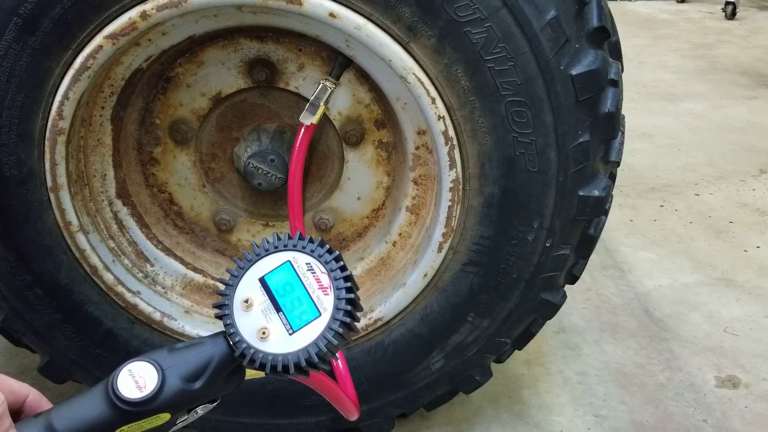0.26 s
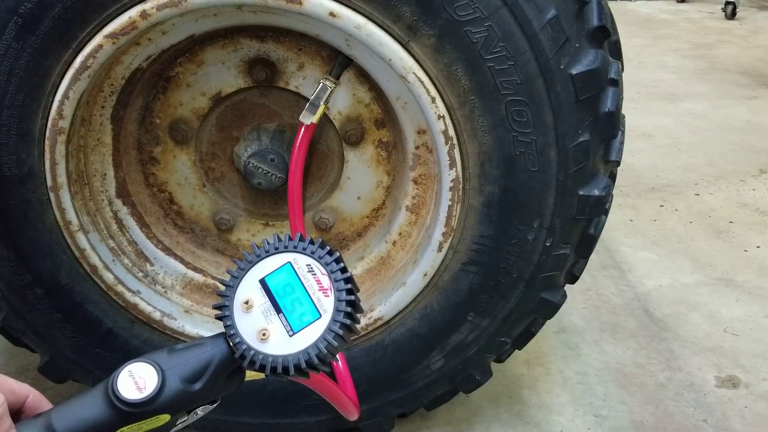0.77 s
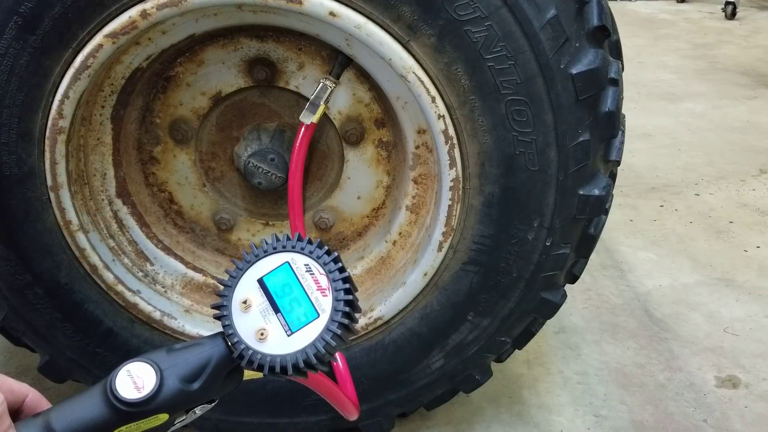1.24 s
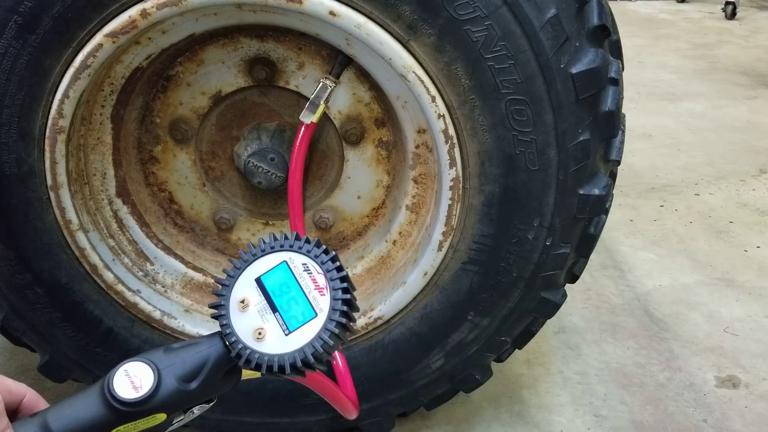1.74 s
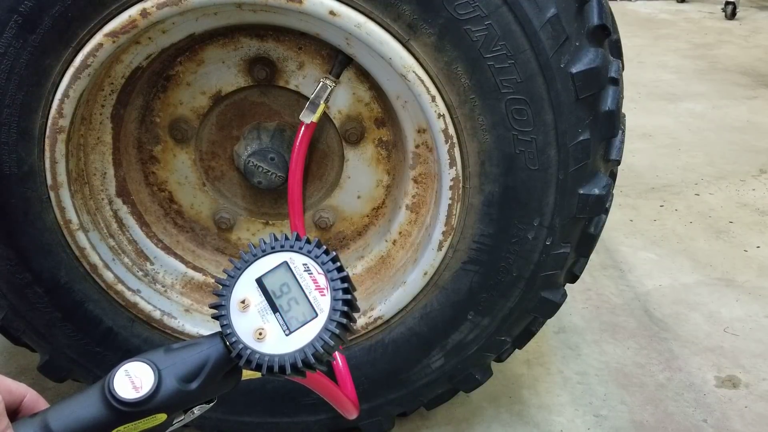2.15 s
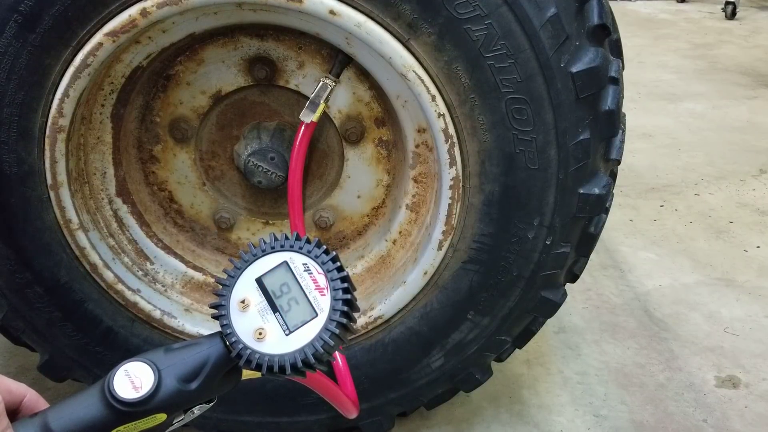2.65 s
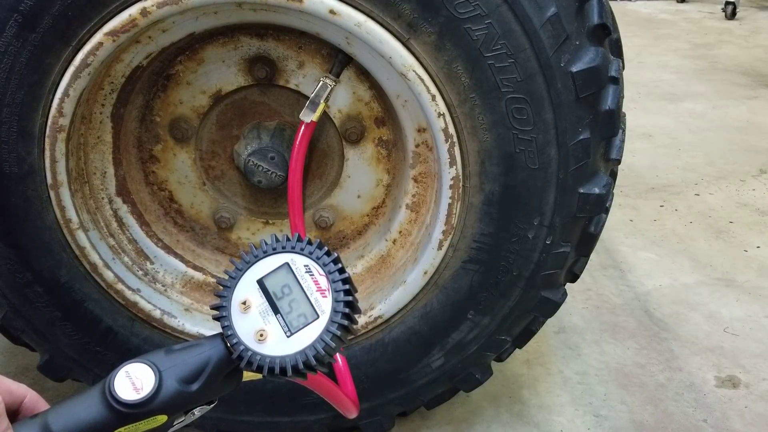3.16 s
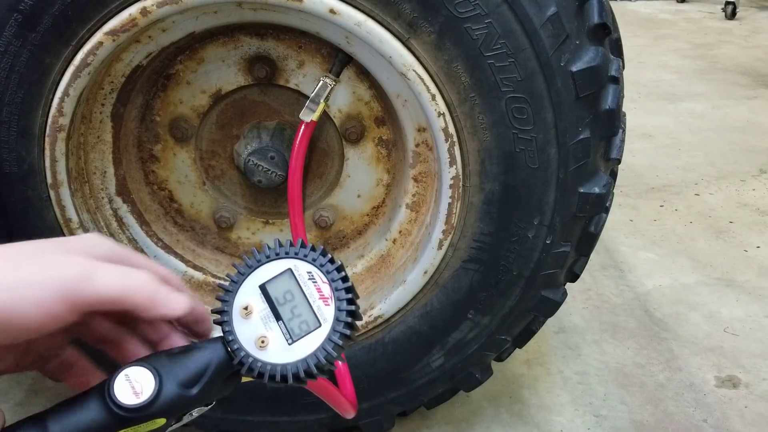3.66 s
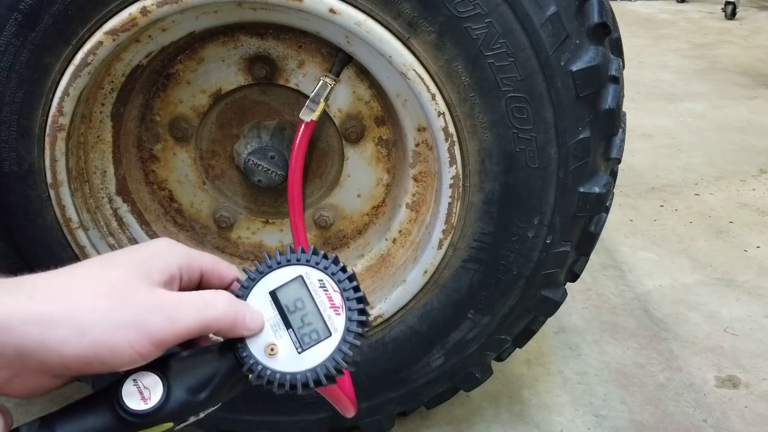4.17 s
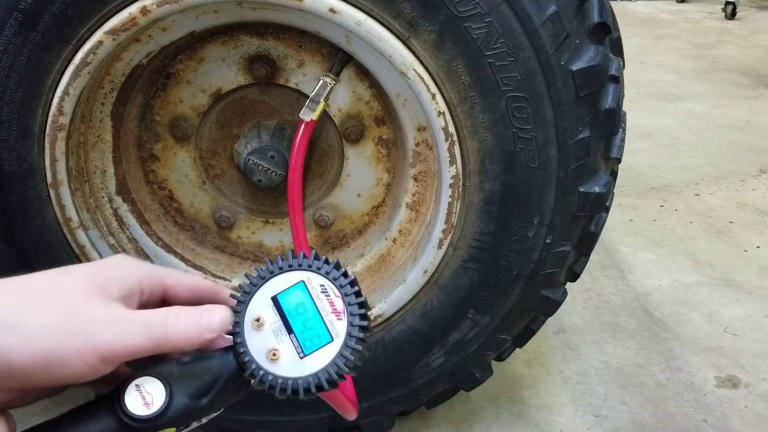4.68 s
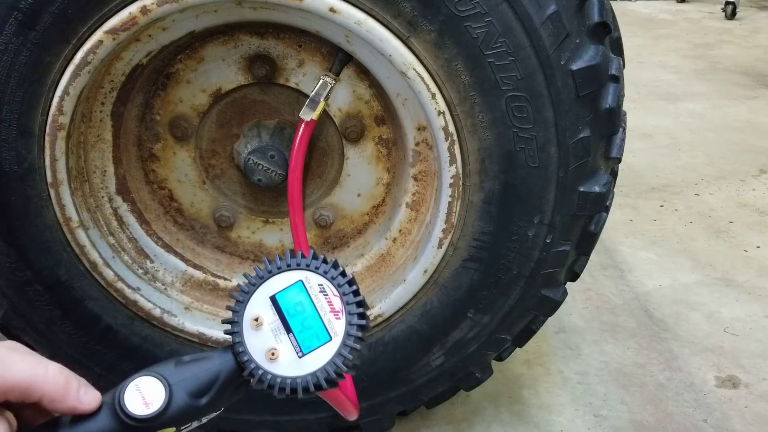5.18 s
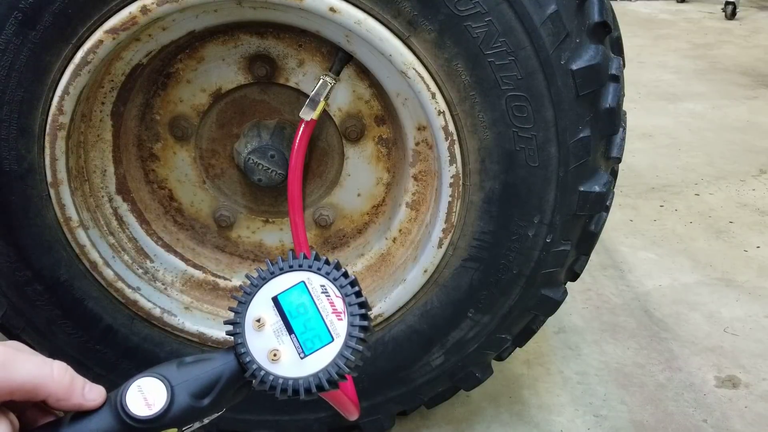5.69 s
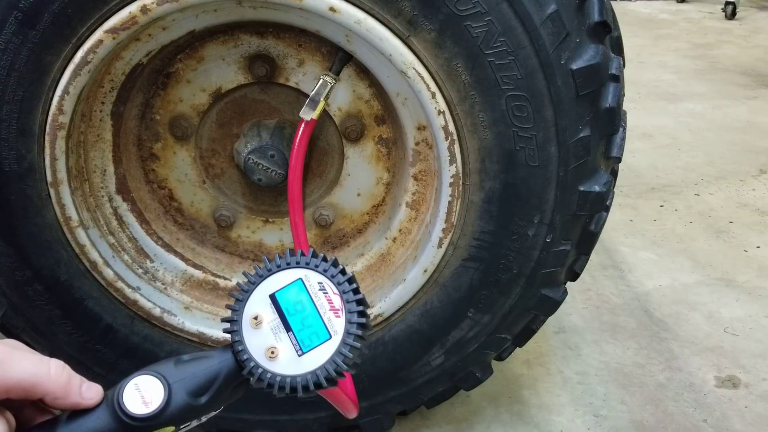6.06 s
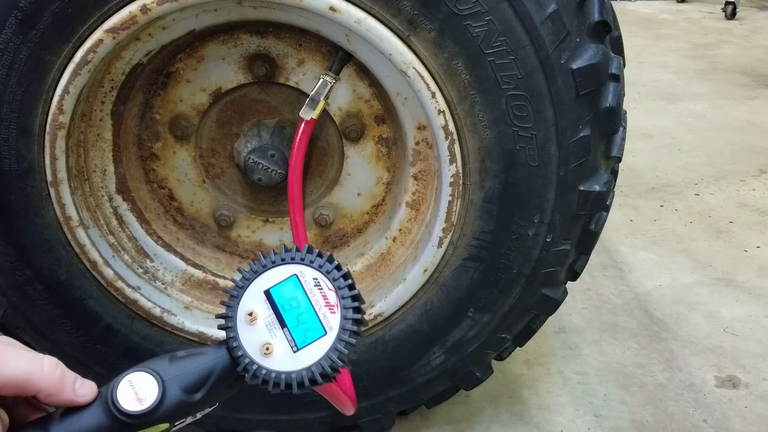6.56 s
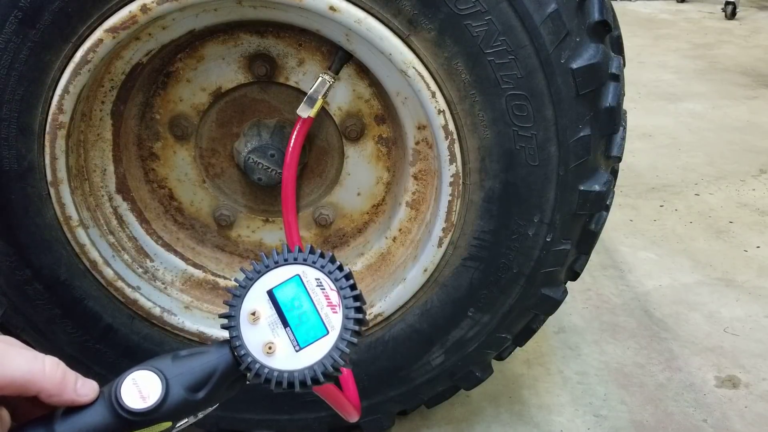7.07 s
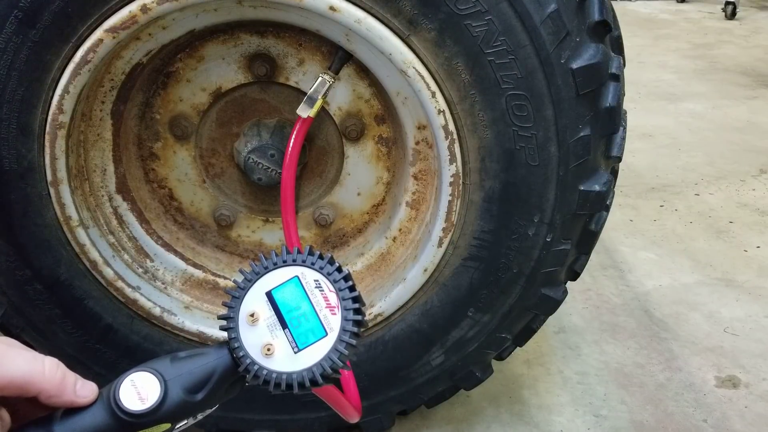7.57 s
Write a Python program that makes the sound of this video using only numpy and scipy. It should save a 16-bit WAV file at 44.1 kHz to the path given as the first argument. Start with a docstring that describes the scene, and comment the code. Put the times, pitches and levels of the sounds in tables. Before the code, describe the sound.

Compressed air rushes through an inflator hose and valve into a big tire, heard from close by in a workshop. The bright hiss swells slightly over the first half second and then holds steady, easing only a little as the tire fills. Within it the tire rings faintly and the valve gives thin, high whistles. A low, wavering electric hum and a soft rumble come up with the hiss and stay underneath. At about 6.8 seconds trapped air escapes in one short, louder, bright blast that spits slightly, with a soft thump from the valve as the flow is shut off. The hiss stops, and the hum and rumble drop away at about 6.9 seconds. The blast dies out in a short room echo, leaving near quiet from about 7.5 seconds to the end at 8. Everything sits somewhat to the left.

```python
"""First comes a hiss: compressed air rushing through an inflator hose and valve into a big tire.
The jet of air makes the inside of the tire ring and whistles faintly in the valve. A low hum
and rumble fade in at the start and drop away near the end. When the flow is shut off, trapped air
escapes in a short, bright blast with a soft thump from the valve, and dies away in the workshop."""
import sys
import numpy as np
from scipy import signal
from scipy.fft import rfft, irfft, next_fast_len
from scipy.io import wavfile

SR = 44100
rng = np.random.default_rng(int(sys.argv[2]) if len(sys.argv) > 2 else 0)


def dump(signal):
    """Clip the signal to [-1, 1] and save it as 16-bit WAV at the path in sys.argv[1]."""
    limited = np.clip(np.atleast_2d(signal).T, -1, 1)
    pcm = np.round(limited * 32767).astype(np.int16)
    wavfile.write(sys.argv[1], SR, pcm)


N = 345170
TIME, FREQS = np.arange(N) / SR, np.arange(N // 2 + 1) * SR / N

# Levels are starting points that the functions turn up or down; noise levels are per Hz.
# "Side" is how much louder the left is than the right. A "mode" is a pitch at which something rings.
# hiss of the swirling air in the valve: f/Hz, level/dB
JET_HISS = [(100, -100), (620, -99), (900, -99), (1450, -92), (2000, -84.5), (2500, -85.5), (3200, -82),
            (3700, -74), (5400, -73.5), (6400, -71), (7800, -72), (8600, -77), (10500, -74), (15500, -73)]
# where the jet is heard, and the rumble too: f/Hz, side/dB
JET_AND_RUMBLE_SIDE = [(100, 2), (300, 6.5), (600, 0), (2000, 3.5), (4500, 1), (6400, 7.5), (7500, 7),
                       (8600, 1.5), (11000, 3), (15000, 6)]
# modes of the air in the tire and of its steel rim: f/Hz, width/Hz, level/dB, side/dB
TIRE_RINGING = [(489, 17, -83, 2), (742, 15, -86, -4), (933, 66, -79, 1), (1037, 21, -78, 4),
                (1126, 7, -82, 3), (1171, 11, -78, 1), (1234, 16, -79, -2), (1387, 17, -80, 0),
                (1569, 12, -72, 5), (1639, 9, -69, 1), (1719, 7, -71, 2), (1754, 14, -72, 5),
                (1823, 10, -80, 2), (1898, 9, -75, 5), (2075, 7, -70, 3), (2111, 8, -77, 1),
                (2203, 60, -77, 4), (2265, 10, -70, 11), (2350, 17, -65, 2), (2472, 11, -69, 1),
                (2574, 8, -68, 5), (2728, 42, -73, 2), (2819, 18, -73, 6), (2924, 27, -71, 2),
                (3053, 12, -63, 2), (3107, 17, -73, 3), (3200, 11, -73, 4), (3405, 38, -67, 5),
                (3483, 10, -70, -3), (3576, 37, -70, 3)]
# modes of the valve, the hose and its nozzle: f/Hz, width/Hz, level/dB, side/dB
VALVE_WHISTLES = [(3834, 18, -69, 1), (3905, 43, -70, 4), (3995, 13, -63, 5), (4066, 22, -61, 5),
                  (4184, 10, -68, 4), (4248, 9, -72, 4), (4390, 43, -73, 5), (4505, 15, -72, 5),
                  (5054, 47, -73, 3), (5161, 11, -62, 3), (5199, 13, -63, 4), (5688, 13, -67, 7),
                  (5855, 17, -69, 5), (5995, 22, -63, 7), (6106, 30, -65, 11), (6463, 54, -64, 11),
                  (6539, 53, -62, 11), (6635, 24, -67, 12), (7111, 24, -67, 10), (7198, 14, -61, 14),
                  (7439, 25, -65, 12), (7587, 19, -68, 3), (7679, 20, -71, 7), (7901, 119, -67, 5),
                  (8888, 53, -74, -3), (9720, 56, -67, 6)]
# hiss of the blast: f/Hz, level/dB
BLAST_HISS = [(40, -88.5), (400, -79.5), (700, -81.5), (1000, -74.5), (2000, -71.5), (2900, -67),
              (3800, -58), (4600, -58.5), (6000, -60), (7100, -56), (8700, -68.5), (10500, -59),
              (12700, -58), (15000, -55)]
# brief spits within the blast: t/s, width/s, level change/dB, extra treble change/dB
BLAST_SPITS = [(6.814, .005, .5, 4), (6.869, .003, -0.5, 9), (6.898, .008, 5, -2.5)]
# tones of the electric hum: multiple of the mains frequency, level/dB, side/dB
HUM_TONES = [(2, -66.5, 3.5), (4, -68, 7.5), (6, -73, 16.5), (8, -85.5, 9)]
# low rumble: f/Hz, level/dB
LOW_RUMBLE = [(20, -96), (45, -94.5), (70, -87.5), (92, -79.5), (125, -80), (170, -87.5), (310, -85),
              (400, -92.5), (600, -98.5), (1200, -115)]
# low modes of the room, stirred by the rumble: f/Hz, width/Hz, level/dB, side/dB
ROOM_MODES = [(45, 2.8, -79, 1.5), (72.2, 2.8, -75, 3), (316.5, 10, -82.5, 7)]
# the workshop's echo: f/Hz, time to fade by 60 dB/s, level against the direct sound/dB
ROOM_ECHO = [(100, .7, -3), (500, .9, -2.5), (1300, 0.89, 7), (3700, 0.85, 4), (5000, 0.74, 1.5),
             (7000, 0.56, 4), (10120, 0.42, 1), (15000, 0.28, 3)]
# faint noise of still air: f/Hz, level/dB
STILL_AIR = [(30, -122), (170, -119), (260, -109), (350, -108), (480, -117), (700, -130), (4000, -133),
             (15000, -135)]
# how alike left and right are: f/Hz, likeness (1 = the same, 0 = unrelated)
STEREO_LIKENESS = [(60, 0.98), (150, 0.91), (400, 0.45), (800, 0.62), (1400, 0.26), (4000, 0.35), (8000, 0)]

FADE_IN_S, SHUT_S = 0.43, 6.85   # the fade-in ends; the flow is shut off
BLAST_SIDE_DB = 8


def filling(jet_db, valve_db, flutter_db, waver_db):
    """The jet of air hisses and makes the tire and valve ring; all three follow the flow."""
    full_db, opening_db = 1.23, 4.5   # the flow builds up as the valve opens
    sag_db_per_s, shut_db_per_s = 0.2736, 302   # the flow sags as the tire's pressure rises
    flow_db = full_db - opening_db * fade_in_left() - sag_db_per_s * TIME - shut_db_per_s * since(SHUT_S)
    jet = noise(from_db(at_hz(JET_HISS) + jet_db) * pan(at_hz(JET_AND_RUMBLE_SIDE)))
    tire = noise(resonances(TIRE_RINGING))
    valve = from_db(valve_db + waver_db * drift(7)) * noise(resonances(VALVE_WHISTLES))
    return (jet + tire + valve) * from_db(flow_db + flutter_db * drift(40))


def air_blast(start_s, level_db, sputter_db):
    """Trapped air bursts out, sputters and weakens as the hose empties; the treble fades first."""
    attack_s, hold_s, treble_hz = 0.00302, 0.11, 8900
    sag_db_per_s, release_db_per_s, dulling_db_per_s = 43, 331.5, 66
    age = since(start_s)
    blast_db = -sag_db_per_s * age - release_db_per_s * since(start_s + hold_s)
    treble_db = 4.5 - dulling_db_per_s * age   # brightest at full pressure
    for spit_s, width_s, change_db, extra_db in BLAST_SPITS:
        spit = np.exp(-.5 * ((TIME - spit_s) / width_s) ** 2)
        blast_db += change_db * spit
        treble_db += extra_db * spit
    air = noise(from_db(at_hz(BLAST_HISS) + level_db) * pan(BLAST_SIDE_DB))
    treble = irfft(rfft(air) * (FREQS > treble_hz), N)
    air = air - treble + treble * from_db(treble_db)
    attack = np.minimum(age / attack_s, 1)
    return air * attack * from_db(blast_db + sputter_db * drift(150))


def valve_thump(start_s, hz, fade_s, level_db, fall_s):
    """The inflator's valve gives a soft thump whose pitch falls quickly."""
    age = since(start_s)
    cycles = hz * fall_s * (1 - np.exp(-age / fall_s))
    return pan(BLAST_SIDE_DB) * from_db(level_db - 60 * age / fade_s) * np.sin(2 * np.pi * cycles)


def drone(mains_hz, hum_db, rumble_db, waver_db, drop_s):
    """A wavering electric hum and a low rumble fade in at the start and drop away near the end."""
    hum = 0
    for multiple, db, side_db in HUM_TONES:
        tone = np.sqrt(2) * np.sin(2 * np.pi * (multiple * mains_hz * TIME + rng.random()))
        hum = hum + tone * pan(side_db) * from_db(db + waver_db * drift(3))
    rumble = noise(from_db(at_hz(LOW_RUMBLE) + rumble_db) * pan(at_hz(JET_AND_RUMBLE_SIDE)))
    rumble += noise(resonances(ROOM_MODES))
    quick_drop_db = -168.5 * since(drop_s)
    lingering_db = -12.5 - 23 * since(drop_s)
    fade_db = np.maximum(quick_drop_db, lingering_db) - 7.5 * fade_in_left()
    return (from_db(hum_db) * hum + rumble) * from_db(fade_db)


def workshop(sound, echo_db, crossing):
    """The room adds an echo in which each band of pitches fades at its own rate; total power is kept."""
    t, hz = np.arange(SR) / SR, np.arange(SR // 2 + 1.)
    centres = np.geomspace(60, 16000, 26)
    white, tail = rfft(rng.standard_normal((2, SR))), 0
    for centre, this_band in zip(centres, np.eye(len(centres))):
        band = irfft(white * np.interp(hz, centres, this_band), SR)
        decay = from_db(-60 * t / at_hz(ROOM_ECHO, centre))
        decay *= 1 - np.exp(-t / 0.018)   # echoes take a moment to build up
        tail = tail + band * decay / np.linalg.norm(decay)
    size = next_fast_len(N + SR)
    echo_gain = from_db(at_hz(ROOM_ECHO, np.arange(size // 2 + 1) * SR / size, column=2) + echo_db)
    direct = rfft(sound, size)
    spread = (direct + crossing * direct[::-1]) / np.hypot(1, crossing)   # echoes reach the far side too
    echo = echo_gain * spread * rfft(tail, size)
    return irfft((direct + echo) / np.sqrt(1 + echo_gain ** 2), size)[:, :N]


def still_air():
    """A faint, steady noise lies under everything."""
    return noise(from_db(at_hz(STILL_AIR)))


def fade_in_left():
    """How much of the fade-in is still to come: 1 at first, then down to 0."""
    return np.maximum(1 - TIME / FADE_IN_S, 0)


def resonances(modes, steepness=1.17):
    """How strongly a set of modes rings at each frequency; their powers add up."""
    power = 0
    for hz, width, db, side_db in modes:
        off_pitch = 2 * (FREQS - hz) / width
        peak = from_db(db) * pan(side_db)
        power = power + peak ** 2 / (1 + off_pitch ** 2 / steepness) ** steepness
    return np.sqrt(power)


def noise(strength):
    """Noise with a given strength at each frequency; left and right are most alike in the bass."""
    shared, opposed = rfft(rng.standard_normal((2, N)))
    alike = at_hz(STEREO_LIKENESS)
    pair = np.sqrt(1 + alike) * shared + np.sqrt(1 - alike) * opposed * [[1], [-1]]
    return irfft(pair * strength, N) * np.sqrt(SR) / 2


def drift(rate_hz):
    """A random wobble of typical size 1, mostly slower than the given rate."""
    wobble = irfft(rfft(rng.standard_normal(N)) / (1 + (FREQS / rate_hz) ** 2), N)
    return wobble / np.std(wobble)


def pan(side_db):
    """Left and right gains that place a sound without changing its total power."""
    gains = from_db(np.array([[.5], [-.5]]) * side_db)
    return gains / np.sqrt(np.mean(gains ** 2, axis=0))


def at_hz(rows, hz=FREQS, column=1):
    """Read a table at any frequency, blending between its rows by pitch."""
    rows = np.array(rows)
    return np.interp(np.log(hz + 1e-9), np.log(rows[:, 0]), rows[:, column])


def since(start_s):
    """Seconds gone by since a moment; zero before it."""
    return np.maximum(TIME - start_s, 0)


def from_db(db):
    """Turn decibels into a number to multiply by."""
    return 10 ** (np.asarray(db) / 20)


def scene():
    """Hiss and blast echo in the workshop, joined by the thump, the drone and the still air."""
    hiss = filling(jet_db=-0.77, valve_db=0.57, flutter_db=0.29, waver_db=0.33)
    hiss = workshop(hiss, echo_db=-11.0, crossing=0.082)
    blast = air_blast(start_s=6.797, level_db=1.32, sputter_db=0.5)
    blast = workshop(blast, echo_db=-3.0, crossing=0.49)
    thump = valve_thump(start_s=6.862, hz=500, fade_s=0.055, level_db=-42.5, fall_s=.011)
    hum_and_rumble = drone(mains_hz=60, hum_db=-1.0, rumble_db=-1.4, waver_db=3.0, drop_s=6.89)
    return hiss + blast + thump + hum_and_rumble + still_air()


def record(dry):
    """Cut away the very highest treble."""
    cutoff_hz = 15730
    low_pass = signal.firwin(801, cutoff_hz, fs=SR, window="blackman")
    return signal.fftconvolve(dry, low_pass[None], mode="same", axes=1)


dry = scene()
out = record(dry)
dump(out)
```